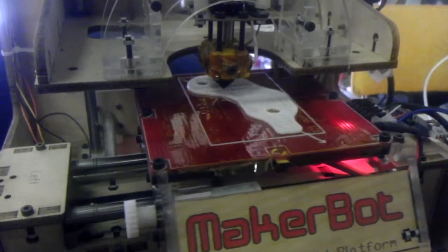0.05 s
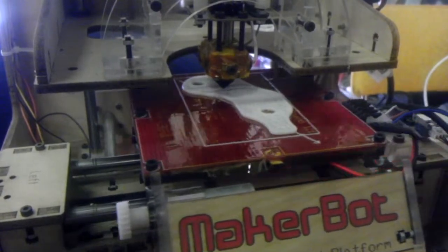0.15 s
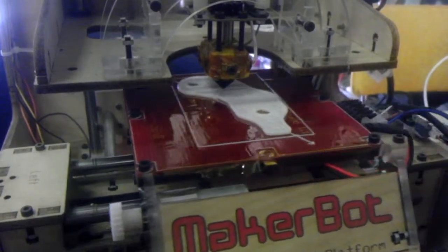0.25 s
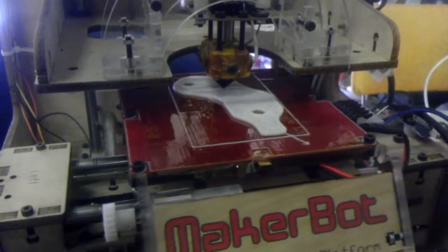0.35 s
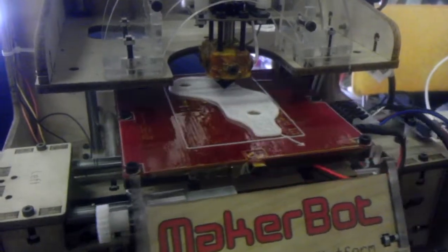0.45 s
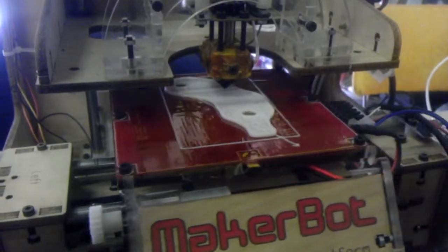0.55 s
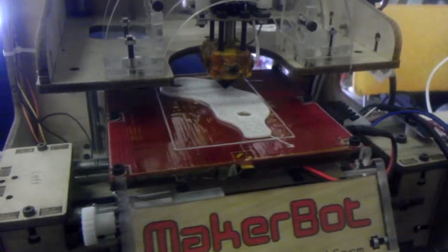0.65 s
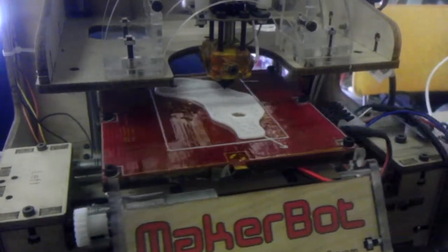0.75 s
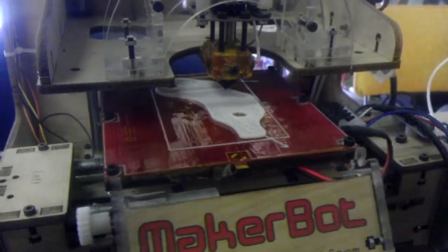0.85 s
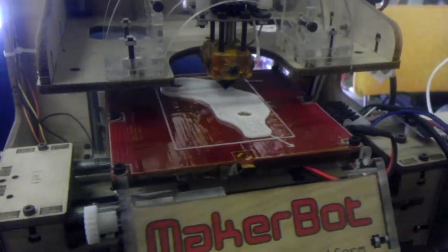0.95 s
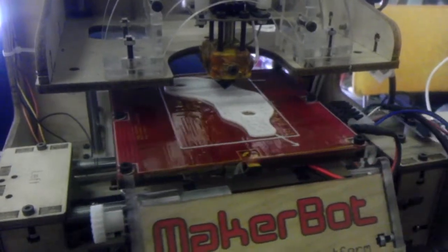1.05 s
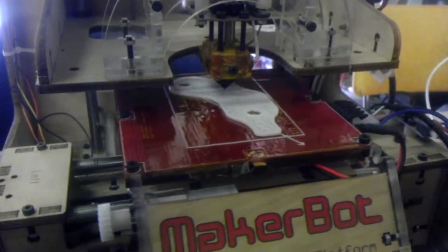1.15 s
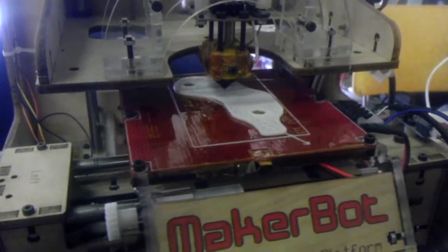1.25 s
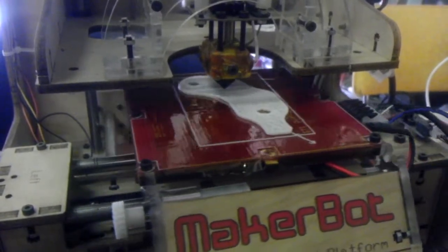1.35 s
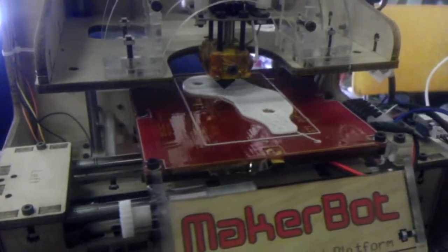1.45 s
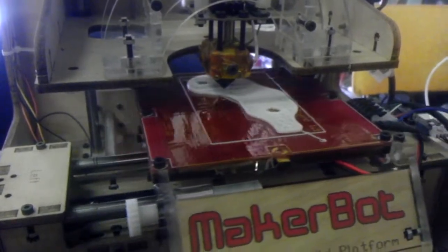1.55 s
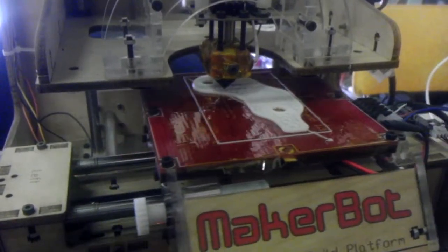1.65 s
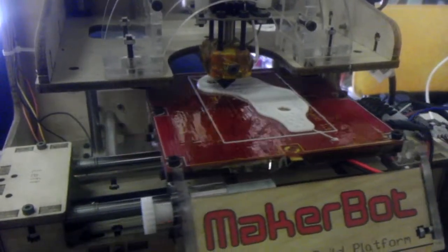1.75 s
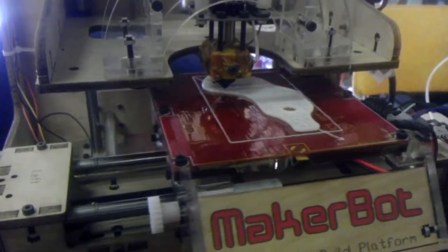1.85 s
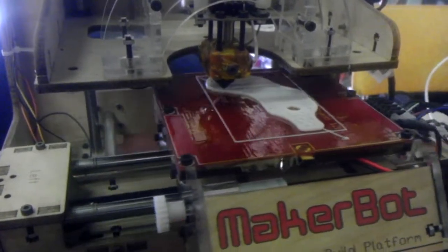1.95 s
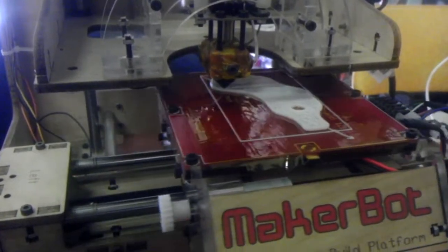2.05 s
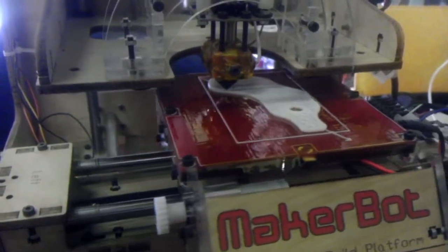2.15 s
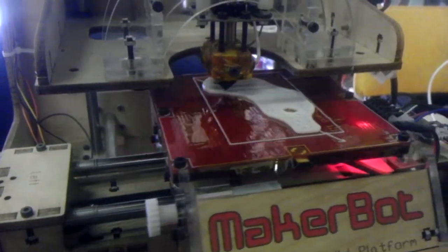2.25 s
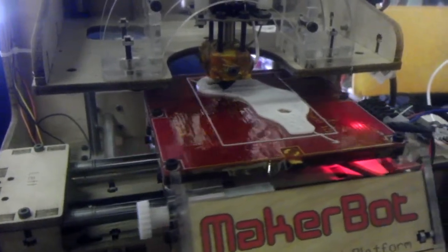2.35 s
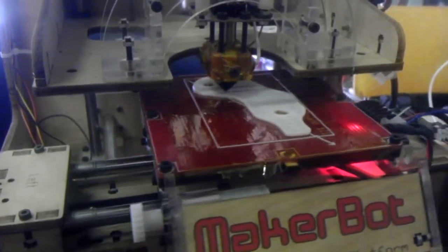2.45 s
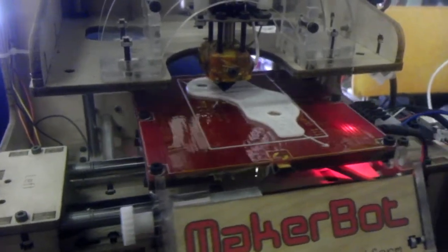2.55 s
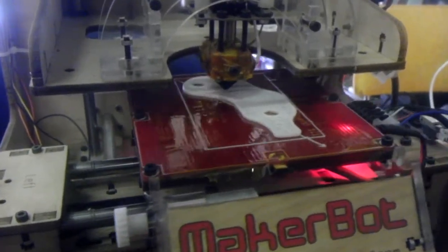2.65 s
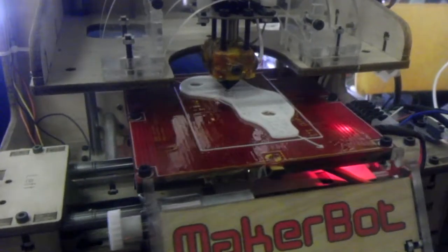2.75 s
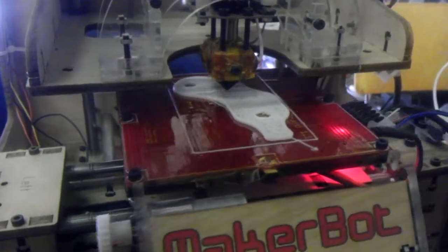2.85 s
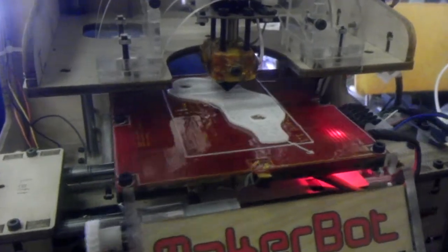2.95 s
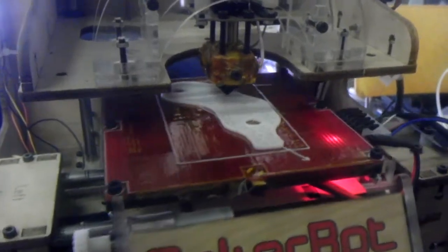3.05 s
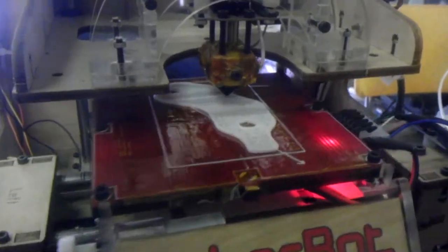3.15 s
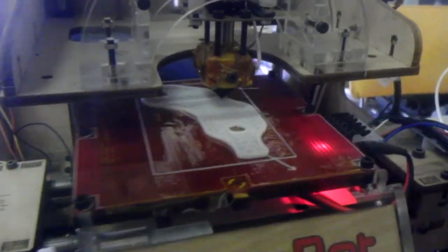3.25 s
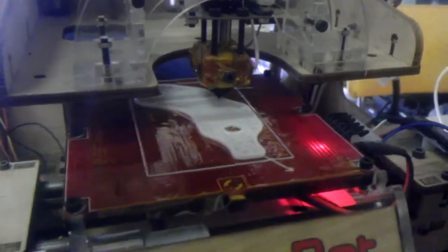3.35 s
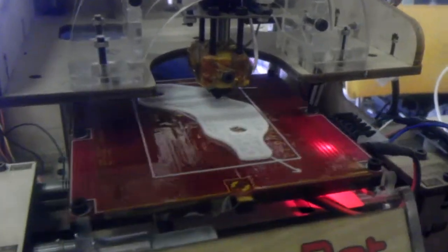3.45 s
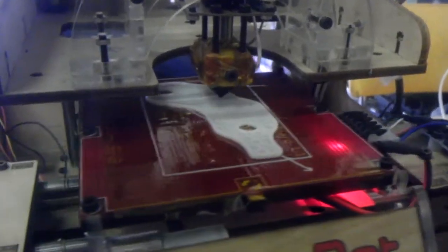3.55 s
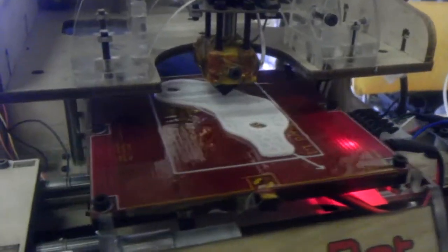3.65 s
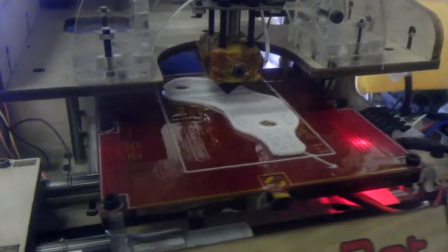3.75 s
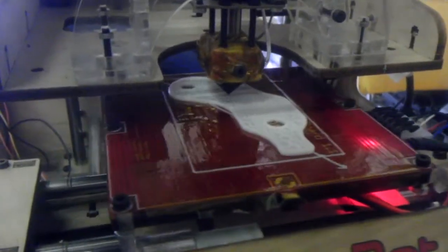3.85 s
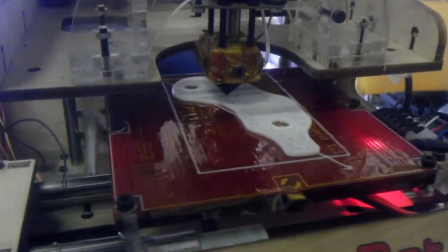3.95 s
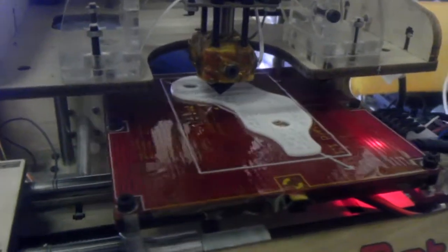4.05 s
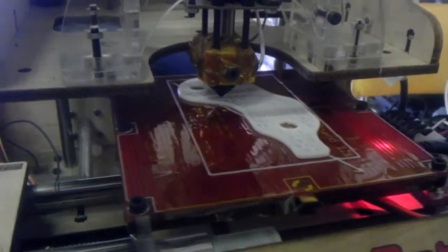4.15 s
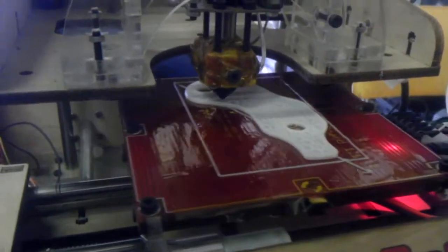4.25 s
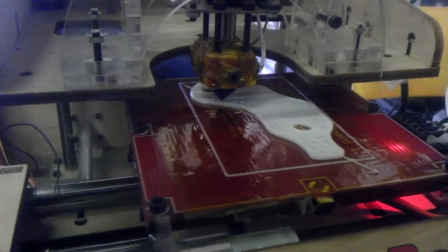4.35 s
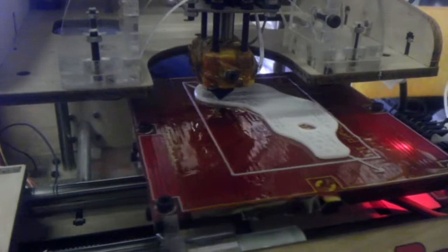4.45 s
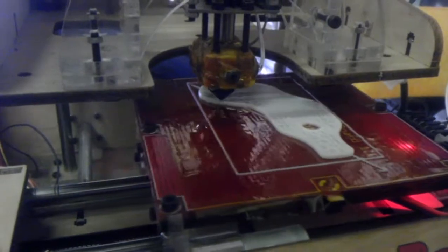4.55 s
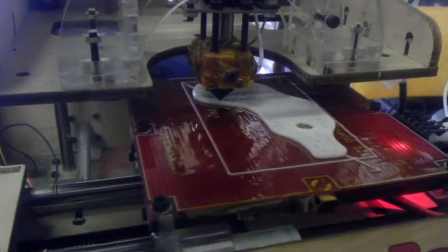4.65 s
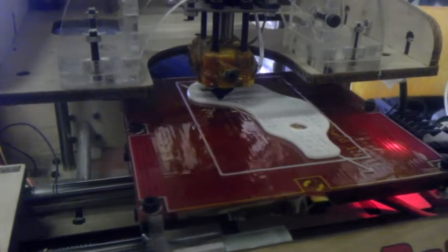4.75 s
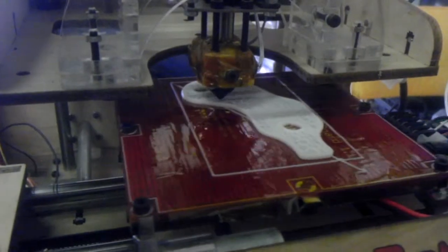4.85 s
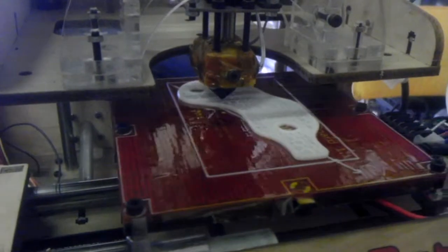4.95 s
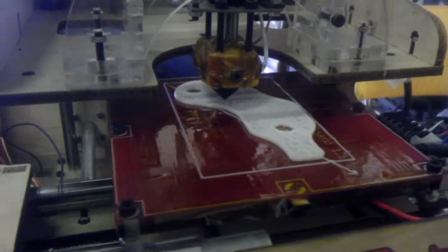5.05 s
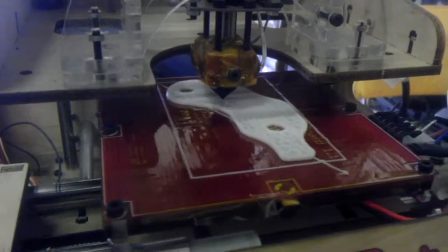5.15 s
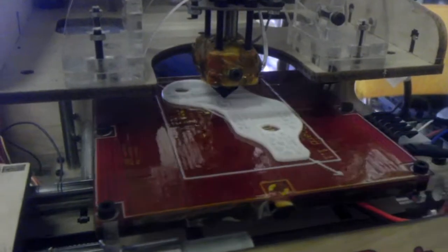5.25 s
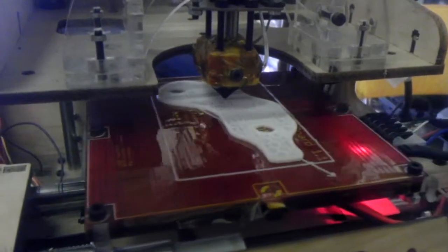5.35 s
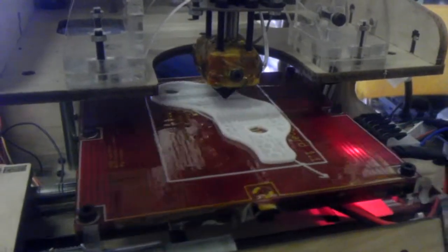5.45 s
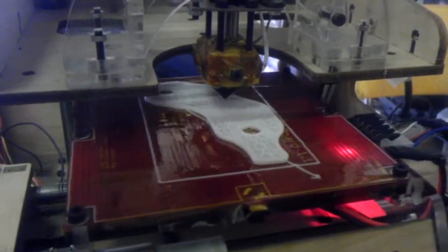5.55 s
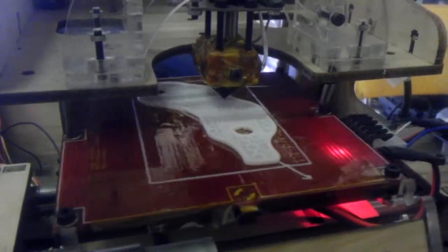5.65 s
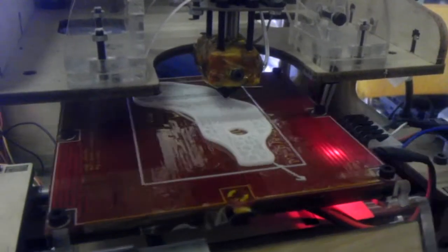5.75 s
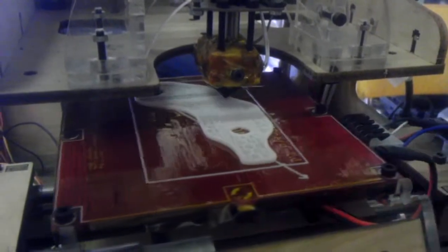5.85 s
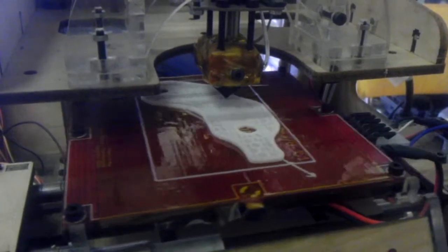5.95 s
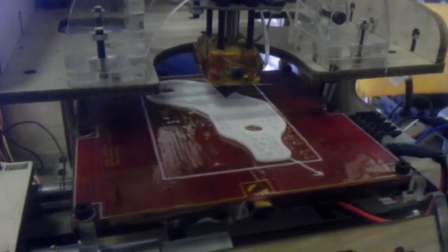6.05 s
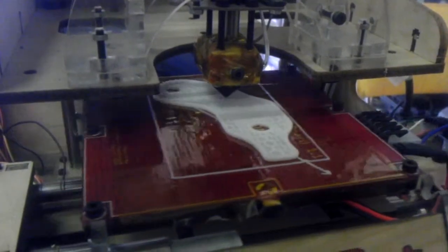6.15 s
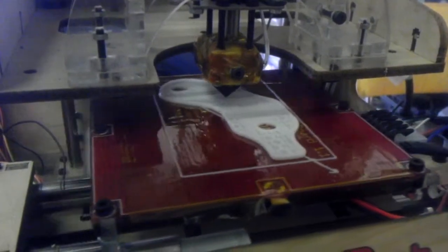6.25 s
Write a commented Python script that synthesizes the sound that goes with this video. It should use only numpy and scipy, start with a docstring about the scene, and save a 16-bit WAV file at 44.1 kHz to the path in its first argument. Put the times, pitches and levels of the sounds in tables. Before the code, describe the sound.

Close to a desktop 3D printer in a small workshop, a steady, piercing stepper whine near 1400 Hz sounds over a buzzing belt and lower motor tones. About every 1.25 seconds the table reverses: the whine dips for an instant, a tiny electronic-sounding chirp bursts out with rattle and woody clacks, then a slightly different buzz resumes. Frame hum, bearing rumble and airy fan noise lie behind.

```python
"""An extruder stepper whines steadily, close by in a small workshop, as a desktop 3D printer lays down a layer.
Its whine is a stack of steady harmonics; the build table shuttles below on a buzzing belt, each pass at a new pitch.
At each turn the extruder pauses and both table motors chirp: short tone bursts, with rattle and rasp.
Knocks ring the plywood frame as decaying modes, with ticks, pings and clinks on top.
Behind lie a beating frame hum, bearing rumble, faint squeaks, a coil whistle, bright hiss and a fan's shaped noise."""
import sys
import numpy as np
from scipy import signal
from scipy.fft import rfft, irfft, next_fast_len
from scipy.io import wavfile

SR = 44100
rng = np.random.default_rng(int(sys.argv[2]) if len(sys.argv) > 2 else 0)


def int16_out(signal):
    """Quantize to a 16-bit WAV file."""
    q = np.round(np.clip(np.atleast_2d(signal).T, -1, 1) * 32767)
    wavfile.write(sys.argv[1], SR, q.astype(np.int16))


N = 277389
TIME = np.arange(N) / SR


def from_db(db):
    """Level in dB to linear gain."""
    return 10 ** (np.asarray(db) / 20)


def rms_one(x):
    """Normalise to an rms of 1."""
    return x / np.sqrt(np.mean(x ** 2) + 1e-20)


def in_time(rows):
    """Automation curves: the columns after t/s, joined by straight lines."""
    s, *columns = np.transpose(rows)
    return [np.interp(TIME, s, column) for column in columns]


def at_hz(points, hz):
    """Read a spectrum on a log-frequency axis."""
    f, value = np.transpose(points)
    return np.interp(np.log(hz + 1e-9), np.log(f), value)


def panned(pan_db):
    """Left and right gains for a left-minus-right level in dB."""
    return from_db(np.array([[.5], [-.5]]) * pan_db)


def drift(rate):
    """Random modulation of spread 1: noise through two equal poles at this rate in Hz."""
    hop = 40   # samples between the points of the slow curve
    r = np.exp(-2 * np.pi * rate * hop / SR)
    steps = rng.standard_normal(N // hop + 2002)
    slow = signal.lfilter([1], [1, -2 * r, r * r], steps)[2000:]   # drop the filter's run-in
    return np.interp(np.arange(N) / hop, np.arange(len(slow)), rms_one(slow))


def turning(hz):
    """Phase of a rotation at a changing rate."""
    return 2 * np.pi * np.cumsum(hz) / SR


def tone(phase, flutter_db):
    """A sine, of rms 1 before its strength flutters with the load."""
    sine = np.sin(phase + rng.uniform(0, 2 * np.pi))
    return np.sqrt(2) * sine * from_db(flutter_db * drift(7.8))


def ring(push, hz, t60):
    """A damped resonance: a unit click sets a sine of starting height 1 ringing."""
    r, w = from_db(-60 / (t60 * SR)), 2 * np.pi * hz / SR
    return signal.lfilter([0, np.sin(w)], [1, -2 * r * np.cos(w), r * r], push + 1e-18)


def burst(start, length, rise, fall):
    """An envelope that rises, holds for a length of time and dies away."""
    age = np.maximum(TIME - start, 0)
    return (1 - np.exp(-age / rise)) * np.exp(-np.clip((age - length) / fall, 0, 50))


# stereo width of the noises: f/Hz, left-right likeness
LIKENESS = [(30, 0.49), (70, 1), (350, 0.91), (700, 0.78), (1100, 0.68), (2000, 0.087), (5000, 0.1),
            (12000, 0.035)]
# stereo lean of the noises: f/Hz, left-right level/dB
LEAN = [(300, 0), (750, -1), (1350, 4), (2200, 3), (4000, -3.5), (6000, -0.5), (9500, 3.5), (12500, -4.5)]


def noise(spectrum):
    """Stereo noise of a given colour, alike in the bass and wide in the treble; rms 1."""
    size = next_fast_len(N)
    hz = np.arange(size // 2 + 1) * SR / size
    mid, side = rfft(rng.standard_normal((2, size)))
    alike = np.clip(at_hz(LIKENESS, hz), -1, .995)
    both = np.sqrt(1 + alike) * mid + np.sqrt(1 - alike) * side * [[1], [-1]]
    both = both * panned(at_hz(LEAN, hz)) * from_db(at_hz(spectrum, hz))
    return rms_one(irfft(both, size)[:, :N])


# the strongest tone stands as a wave around the frame, its sign flipping at a node near the left ear:
# t/s, level at the right ear/dB, signed share at the left ear
WHINE = [(0, -33.5, 0.051), (0.8, -34, -0.13), (1.5, -35, -0.066), (2.05, -37, 0.44), (2.7, -33.5, -0.035),
         (3.3, -33.5, -0.26), (3.95, -38, -0.48), (4.5, -41, 0.032), (5.2, -35.5, -0.45),
         (5.7, -33.5, -0.45), (6.29, -39, -0.51)]
# swell and fade of the fifth harmonic as the table travels: t/s, level/dB
FIFTH_LEVEL = [(0, -47), (1.1, -47), (1.9, -46), (2.5, -48.5), (2.75, -44), (3.25, -44.5), (3.65, -51),
               (4.15, -45), (5.7, -46.5), (6.29, -51)]
# the extruder's other tones: multiple of the feed rate, level/dB, left-right level/dB
FEED_TONES = [(2, -59.5, 8.5), (3, -70, 22.5), (4, -58, -3), (6, -57.5, -13), (7, -58.5, 10.5),
              (9, -76.5, 24.5), (12, -81, 19), (14, -76, 8), (15, -72.5, -5), (24, -75.5, 7)]
FEED_HZ, WHINE_ORDER, FIFTH_ORDER = 176.37, 8, 5
WHINE_LEAK = 0.084   # share that travels on and fills the node, a quarter cycle late


def extruder(feed):
    """The filament motor steps at a nearly constant rate: clean harmonics, one far above the rest."""
    whine_db, left_share = in_time(WHINE)
    phase = WHINE_ORDER * feed
    left = left_share * np.sin(phase) - WHINE_LEAK * np.cos(phase)
    whine = np.sqrt(2) * from_db(whine_db + 0.93 * drift(25)) * np.array([left, np.sin(phase)])
    others = sum(from_db(db) * panned(pan) * tone(round(k) * feed, flutter_db=2.5)
                 for k, db, pan in FEED_TONES)
    fifth_db, = in_time(FIFTH_LEVEL)
    fifth = from_db(fifth_db) * tone(FIFTH_ORDER * feed, flutter_db=0.95) * panned(-0.76)
    return (whine + fifth + others) * feeding()


# turns of the table, where its two motors jog together; each starts the next pass:
# t/s, length/s, main step tone f/Hz, level/dB, second step tone f/Hz, level/dB,
# overtone level relative to main/dB, rattle level/dB, rasp level/dB
TURNS = [(0.868, 0.022, 1303, -32.5, 853, -39, -35, -36, -55),
         (2.129, 0.043, 773, -25, 845, -30, -26, -42.5, -54),
         (3.385, 0.019, 1302, -31.5, 895, -31.5, -34, -36, -54),
         (4.607, 0.078, 372.6, -20, 929, -40, -9.5, -38.5, -40),
         (5.859, 0.015, 1041, -32, 826, -41, -26, -38, -46)]


def feeding():
    """Gate near 1 while the extruder runs, dipping towards 0 as it rests during a turn."""
    return 1 - sum(burst(start, length, rise=0.0089, fall=0.0028) for start, length, *_ in TURNS)


# passes of the table, before, between and after the turns: belt buzz f/Hz, buzz level before trim/dB,
# motor tone level before trim/dB, extra level of mixed tones above the whine/dB
PASSES = [(49.45, -45, -46, -15), (48.56, -48, -47.5, -10), (49.4, -45.5, -48, -14.5),
          (49.37, -44.5, -47.5, -18), (48.88, -45.5, -46.5, -18.5), (49.66, -45.5, -44.5, -23)]
# motor tone in each pass: f/Hz
MOTOR_HZ = [665.8, 659.5, 661.0, 660.0, 661.0, 666.5]
# belt buzz partials: multiple of the belt rate, relative level/dB
BUZZ_TONES = [(2, -32.5), (3, -22), (5, -6), (6, -3), (7, 0), (8, 0), (11, -11.5), (12, -14)]
# the two motors shake one frame and make sum and difference tones:
# multiple of the whine, multiple of the table tone, relative level/dB
MIXED_TONES = [(0, 1, 1.5), (2, -3, -7.5), (3, -5, -5.5), (0, 2, -15), (2, -2, -3), (1, 1, -2.5),
               (2, -1, -1), (3, -1, -18.5), (4, -2, -19), (4, -1, -21)]
# difference tone of whine and table motor: t/s, level/dB
DIFFERENCE_LEVEL = [(0, -52), (0.4, -45.5), (1.05, -52.5), (2, -52.5), (2.35, -57), (2.8, -46.5),
                    (3.3, -48), (3.8, -50.5), (4.85, -55.5), (5.25, -46.5), (5.7, -48), (6, -51)]
# colour of the rumble, shared by belt scuff and bearings: f/Hz, level/dB per Hz
RUMBLE = [(25, -54), (50, -26), (80, -21), (110, -3), (180, 0.5), (250, 3.5), (370, -0.5), (450, -7),
          (600, -5.5), (780, -5.5), (950, -3.5), (1120, -13), (1300, -11.5), (1600, -18), (1950, -14.5),
          (2600, -28), (5000, -55)]


def table_drive(feed):
    """Speed is nearly constant along a pass; the belt buzzes and the motor tone mixes with the whine."""
    now = np.searchsorted([start + length / 2 for start, length, *_ in TURNS], TIME)   # pass in play
    buzz_hz, buzz_db, motor_db, high_db = np.array(PASSES)[now].T
    motor_hz = np.array(MOTOR_HZ)[now]
    belt = turning(buzz_hz * (1 + 0.0039 * drift(11.0)))
    motor = turning(motor_hz * (1 + 0.00043 * drift(11.0)))

    buzz = sum(from_db(db) * tone(round(k) * belt, flutter_db=2.5) for k, db in BUZZ_TONES)
    scuff = noise(RUMBLE) * (1 + np.cos(belt))   # each tooth also scuffs its pulley
    no_bass = signal.butter(4, 100, "high", fs=SR, output="sos")
    buzz = buzz + from_db(-6.0) * signal.sosfilt(no_bass, scuff)

    whine = WHINE_ORDER * feed
    mixed = 0
    for a, b, db in MIXED_TONES:
        phase = round(a) * whine + round(b) * motor
        above_whine = phase[-1] > whine[-1]
        mixed = mixed + from_db(db + above_whine * high_db) * tone(phase, flutter_db=2.0)
    difference_db, = in_time(DIFFERENCE_LEVEL)
    difference = from_db(difference_db) * tone(whine - motor, flutter_db=1.5)
    motor_tones = from_db(motor_db - 3.5) * mixed + difference
    return from_db(buzz_db - 1.86) * buzz * panned(-0.93) + motor_tones * panned(-0.55)


JOG_SLOW_START, JOG_SPEED_UP_S = 0.025, 0.0065   # a jog starts this share below its pitch and speeds up


def jog(start, length, hz):
    """A short run of uneven motor steps that scoops up to pitch; returns its envelope and phase."""
    speed = 1 - JOG_SLOW_START * np.exp(-np.clip((TIME - start) / JOG_SPEED_UP_S, 0, 50))
    phase = turning(hz * speed * (1 + 0.006 * drift(92.0)) * (TIME > start))
    inertia = 2.7 / hz   # the moving mass runs on for a few steps
    return burst(start, length, rise=0.0032, fall=inertia), phase


# overtones of a jog: multiple of the step tone, relative level/dB
JOG_OVERTONES = [(2, -2), (3, -18), (5, -23)]
# colour of rattling panels: f/Hz, level/dB per Hz
RATTLE = [(300, -2), (500, 6.5), (850, 13), (1400, 12.5), (2000, -14), (2800, -25), (4200, -14),
          (5800, -12), (6800, -32), (8500, -35), (14000, -60)]
# colour of rasping loose hardware: f/Hz, level/dB per Hz
RASP = [(1000, -10), (1500, -3.5), (1950, 8), (2400, -2), (3000, -7.5), (4100, -7.5), (5700, -13.5),
        (6600, -26.5), (10000, -36.5), (14000, -74)]
STEP_JITTER_RAD, STEP_SPREAD_DB, TORQUE_FLUTTER_DB = .16, 2.0, .8


def jogs():
    """At a turn both motors jog; panels rattle and hardware rasps, swelling with each uneven main step."""
    out = np.zeros((2, N))
    panels, hardware = noise(RATTLE) * panned(0.65), noise(RASP) * panned(0.73)
    for start, length, main_hz, main_db, second_hz, second_db, overtone_db, rattle_db, rasp_db in TURNS:
        envelope, phase = jog(start, length, main_hz)
        second_envelope, second_phase = jog(start, length, second_hz)
        uneven = phase + STEP_JITTER_RAD * drift(150)
        overtones = sum(from_db(db) * np.cos(round(k) * uneven) for k, db in JOG_OVERTONES)
        steps = np.sin(phase) * from_db(TORQUE_FLUTTER_DB * drift(62))
        steps = steps - overtones * from_db(overtone_db + 1.7 * drift(70))
        main = from_db(main_db) * envelope * steps
        second = from_db(second_db) * second_envelope * np.sin(second_phase)
        out += np.sqrt(2) * (main + second)
        shaking = envelope * (1 + 0.32 * np.sin(uneven)) * from_db(STEP_SPREAD_DB * drift(140))
        out += shaking * (from_db(rattle_db) * panels + from_db(rasp_db) * hardware)
    return out


# knocks and ticks of the table in its slides and at its stops:
# t/s, thud level/dB, clack level/dB, tick level/dB, ping level/dB, chatter level before trim/dB
KNOCKS = [(0.242, -29.5, -35, -70, -70, -70), (0.424, -34, -36, -48, -65, -70),
          (0.867, -36, -27, -36, -24, -51), (0.892, -31.5, -30, -55, -62, -50),
          (0.905, -47, -42, -47, -43, -54), (0.909, -28.5, -40, -68, -70, -72),
          (2.128, -30, -28.5, -63, -33.5, -60), (3.382, -41, -39, -32, -31, -55),
          (3.387, -40, -30, -55, -60, -56), (3.407, -26, -25, -43, -58, -44),
          (3.483, -40, -31, -39, -47, -40), (3.966, -24, -30, -74, -65, -72),
          (4.063, -50, -57, -43, -42, -66), (4.182, -37, -54, -45, -60, -68),
          (4.522, -32.5, -33.5, -70, -59, -70), (4.56, -35, -26.5, -65, -70, -62),
          (4.582, -43, -30, -70, -70, -71), (4.607, -27, -25.5, -32, -25.5, -50),
          (5.267, -25, -27, -71, -47, -70), (5.852, -22.5, -17, -28.5, -19, -42),
          (5.872, -23, -34, -42, -45, -40)]
# modes of plywood frame and table: f/Hz, relative level/dB, t60/s
FRAME = [(213, 3, 0.064), (300, 0.5, 0.12), (361, -4, 0.19), (505, -1, 0.033), (656, -5.5, 0.044),
         (783, 12.5, 0.017), (872, -2, 0.042), (955, -5.5, 0.069), (1066, -14, 0.023), (1233, -9.5, 0.034),
         (1434, -15.5, 0.033), (1950, -2.5, 0.0089), (1943, -4, 0.017)]
# colour of a dry tick: f/Hz, level/dB per Hz
TICK = [(1500, 10.5), (2500, -3), (3400, -6), (4500, -6), (6600, -1), (8000, 2.5), (11000, -4), (14000, -8)]
# colour of a steel rod's ping: f/Hz, level/dB per Hz
PING = [(3000, -33), (4200, 2), (5100, -4), (5500, 6), (5950, 10.5), (6300, -16), (6800, -26), (9000, -46)]
BUILD_CYCLES = 5.9   # t60, in cycles, of a blow's spread through the frame
CHATTER_FALL_S = 0.021


def knocks(contact_s, tick_s, ping_s):
    """A dry tick, a steel rod's ping and a push that swells in every frame mode with its own strength."""
    s, thud_db, clack_db, tick_db, ping_db, chatter_db = np.transpose(KNOCKS)
    at, out = (s * SR).astype(int), np.zeros((2, N))
    for k, (hz, db, t60) in enumerate(FRAME):
        # thud drives the low modes, clack the middle, tick the top
        blow_db = [at_hz([(400, thud), (700, clack), (1100, clack), (3000, tick)], hz)
                   for thud, clack, tick in zip(thud_db, clack_db, tick_db)]
        push = np.zeros(N)
        push[at] = from_db(db + rng.normal(blow_db, 2.04))
        soft = np.exp(-1 / (contact_s * SR))
        push = signal.lfilter([1 - soft], [1, -soft], push)
        swell = ring(push, hz, t60) - ring(push, hz, BUILD_CYCLES / hz)
        out += (-1) ** k * swell * panned(rng.normal(0, 5.3) * hz / 1000)

    def hits(levels, rise, fall):
        return sum(from_db(db) * burst(start, 0, rise, fall) for start, db in zip(s, levels))

    ticks = hits(tick_db, rise=0.00012, fall=tick_s) * noise(TICK) * panned(-5.5)
    pings = hits(ping_db, rise=0.0012, fall=ping_s) * noise(PING) * panned(1.4)
    # a hard knock leaves loose parts and panels shaking
    loose = from_db(-1.5) * chatter() + from_db(-7.5) * noise(RASP) + from_db(-2.0) * noise(RATTLE)
    shakes = hits(chatter_db, rise=0.00065, fall=CHATTER_FALL_S) * loose
    return out + shakes + ticks + pings


# modes of loose nuts and washers: f/Hz, relative level/dB, t60/s
LOOSE = [(1530, 0, 0.0068), (2130, 7, 0.0083), (2620, 1, 0.0054), (3150, -5.5, 0.0088), (3400, -3, 0.0044),
         (4330, -16, 0.0065), (5770, -10, 0.0062)]
CHATTER_PER_S, CHATTER_SPREAD_DB = 2300, 6   # rate and size spread of their contacts


def chatter():
    """Loose nuts and washers touch at random, each contact of its own size; rms 1."""
    sizes = from_db(CHATTER_SPREAD_DB * np.minimum(rng.exponential(1, N), 4))
    contacts = sizes * (rng.random(N) < CHATTER_PER_S / SR)
    return rms_one(sum(from_db(db) * ring(contacts * rng.standard_normal((2, N)), hz, t60)
                       for hz, db, t60 in LOOSE))


# a loose bracket clinks as the table jerks: t/s, level/dB, brightness/dB per octave
CLINKS = [(0.868, -43, 1), (0.892, -35, -4), (0.905, -52, -5), (3.386, -49, 5), (3.412, -36, 11),
          (3.483, -41.5, 22), (5.872, -28, -17)]
# modes of the bracket: f/Hz, relative level/dB, t60/s
BRACKET = [(1760, -10.5, 0.017), (1940, -0.5, 0.032), (2074, -1.5, 0.021), (2490, -20, 0.011),
           (2950, -9, 0.011), (3330, -18, .014)]


def clinks():
    """A loose bracket rings briefly; a brighter contact favours its upper modes."""
    s, level_db, brightness = np.transpose(CLINKS)
    out = np.zeros((2, N))
    for k, (hz, db, t60) in enumerate(BRACKET):
        tilt_db = brightness * np.log2(hz / BRACKET[2][0])   # pivots on the third mode
        chance_db = rng.normal(0, 2.5, (len(s), 2)).T
        push = np.zeros((2, N))
        push[:, (s * SR).astype(int)] = from_db(level_db + db + tilt_db + chance_db)
        out += (-1) ** k * ring(push, hz, t60)
    return out


# a slide scrapes briefly on its rod: t/s, level/dB, fading time/s
SCRAPES = [(3.486, -44, 0.022), (4.265, -49, .02)]


def scrapes():
    """A slide catches on its rod and lets go with a soft, bright hiss."""
    envelope = sum(from_db(db) * burst(start, 0, rise=0.0018, fall=fall) for start, db, fall in SCRAPES)
    return envelope * noise(TICK) * panned(-2.9)


ROOM_DB, ROOM_T60_S = -13, 0.18


def workshop(x):
    """The room adds a short diffuse tail, different at each ear above the bass and low mids."""
    age = TIME[:SR // 2]
    tail = rng.standard_normal((2, len(age))) * from_db(-60 * age / ROOM_T60_S) * (age > .004)
    tail /= np.sqrt(np.sum(tail ** 2, axis=1, keepdims=True))
    low_pass = signal.butter(2, 1100, fs=SR, output="sos")
    tail[1] += signal.sosfiltfilt(low_pass, tail[0] - tail[1])   # long waves reach both ears alike
    return x + from_db(ROOM_DB) * signal.fftconvolve(x, tail, axes=1)[:, :N]


HUM_HZ, HUM_DB, HUM_BEAT_DB, HUM_BEAT_S = 216, -48, 4, 1.84   # mean level, depth and period of the beat
LOW_HUM_HZ, LOW_HUM_DB = 183.1, -52.5


def frame_hum():
    """A frame resonance drones and slowly beats, over a weaker wavering tone."""
    hum_db = HUM_DB + HUM_BEAT_DB * np.cos(2 * np.pi * TIME / HUM_BEAT_S)
    drone = from_db(hum_db) * tone(turning(HUM_HZ + 1.45 * drift(5.3)), flutter_db=1.0)
    low_hum = from_db(LOW_HUM_DB) * tone(turning(LOW_HUM_HZ + 2.13 * drift(7.4)), flutter_db=1.5)
    return drone + low_hum


# deep rumble: t/s, level/dB
BOOM_LEVEL = [(0, -62), (0.2, -45.5), (0.8, -53), (1.1, -55), (3.4, -53), (5.2, -62), (5.7, -51.5),
              (6.1, -58)]
# its colour: f/Hz, level/dB per Hz
BOOM = [(60, -35), (85, -23), (110, -3.5), (150, 0), (200, -15.5), (400, -70)]
RUMBLE_DB = -41.5


def bearing_rumble():
    """Bearings rumble through the frame as dark noise, with a deep layer that comes and goes."""
    rumble = from_db(RUMBLE_DB + 0.53 * drift(8.2)) * noise(RUMBLE)
    boom_db, = in_time(BOOM_LEVEL)
    return rumble + from_db(boom_db) * noise(BOOM)


# level of the bright hiss: t/s, level/dB
HISS_LEVEL = [(0, -70), (0.35, -60), (0.7, -65.5), (2.3, -61.5), (2.85, -69), (3.45, -61.5), (3.9, -69.5),
              (4.15, -56.5), (4.65, -63), (5.05, -61), (5.45, -69.5), (6, -60)]
# its colour: f/Hz, level/dB per Hz
HISS = [(4000, 1.5), (6500, -0.5), (9000, 0.5), (12500, 3.5), (14000, -1.5)]


def bright_hiss():
    """Bright, wide hiss whose level rises and falls."""
    hiss_db, = in_time(HISS_LEVEL)
    return from_db(hiss_db + 2.3 * drift(27.0)) * noise(HISS) * panned(-2.4)


# pitch of the squeak: t/s, f/Hz
SQUEAK_PITCH = [(0.15, 11800), (0.3, 12500), (1.2, 12480), (2.5, 11850), (4, 11850), (4.9, 12500),
                (5.3, 12500), (5.5, 11850)]
SQUEAK_DB, SQUEAK_FIRST_S, SQUEAK_LENGTH_S, SQUEAK_EVERY_S = -69, 0.164, .032, .1608


def squeaks():
    """The extruder's drive gives a faint, very high squeak at even steps of its running time."""
    running_s = np.cumsum(feeding()) / SR - SQUEAK_FIRST_S
    off_s = running_s - SQUEAK_EVERY_S * np.round(running_s / SQUEAK_EVERY_S)   # from the nearest squeak
    rubs = np.exp(-(2 * off_s / SQUEAK_LENGTH_S) ** 2)
    pitch = in_time(SQUEAK_PITCH)[0] + 70 * drift(280)
    return from_db(SQUEAK_DB) * rubs * tone(turning(pitch), flutter_db=0.0) * panned(-3)


def coil_whistle(whistle_db):
    """The motor drivers give off one faint, unsteady whistle that slowly sinks."""
    hz = np.interp(TIME, [0, 1, 6.3], [10600, 10380, 10120])
    return from_db(whistle_db) * tone(turning(hz + 130 * drift(200)), flutter_db=5.0) * panned(8.9)


# colour of the fan: f/Hz, level/dB per Hz
FAN = [(1500, -13), (2500, 7), (3400, 6), (3720, 5), (4000, 7.5), (4300, 8.5), (4550, 3.5), (5200, 2.5),
       (5900, 0), (7000, -40), (14000, -38)]
FAN_DB, FAN_NEARER_DB, LEAN_IN_S = -61, 2, (3, 4)   # it grows as the listener leans in over this span


def fan():
    """The fan blows: a band of airy noise with a gently wavering level."""
    fan_db = FAN_DB + FAN_NEARER_DB * np.interp(TIME, LEAN_IN_S, [0, 1])
    return from_db(fan_db + 1.1 * drift(7.1)) * noise(FAN) * panned(0.33)


def scene():
    """The extruder and table in front, the turns in their room, then the background."""
    feed = turning(FEED_HZ * (1 + 0.00022 * drift(4.7)))
    impacts = knocks(contact_s=.00006, tick_s=0.0047, ping_s=0.0021)
    turns = workshop(jogs() + clinks() + scrapes() + impacts)
    no_bass = signal.butter(3, 130, "high", fs=SR, output="sos")   # the turns carry no deep bass
    turns = signal.sosfilt(no_bass, turns)
    printer = extruder(feed) + table_drive(feed) + turns
    background = frame_hum() + bearing_rumble() + bright_hiss() + squeaks() + coil_whistle(whistle_db=-81.0)
    return printer + background + fan()


CUTOFF_HZ = 14200


def record(dry):
    """The top is cut steeply by an elliptic low-pass."""
    return signal.sosfilt(signal.ellip(12, .1, 80, CUTOFF_HZ, fs=SR, output="sos"), dry)


dry = scene()
out = record(dry)
int16_out(out)
```